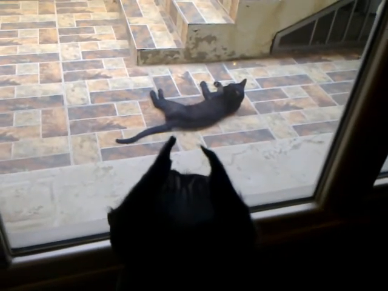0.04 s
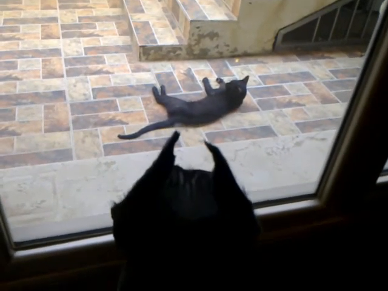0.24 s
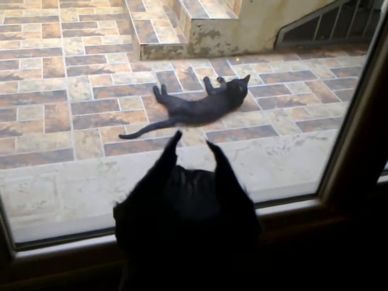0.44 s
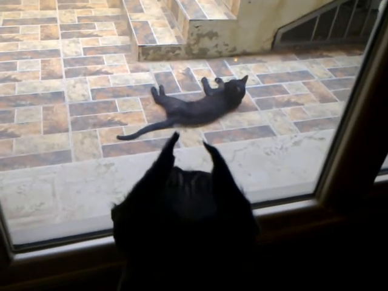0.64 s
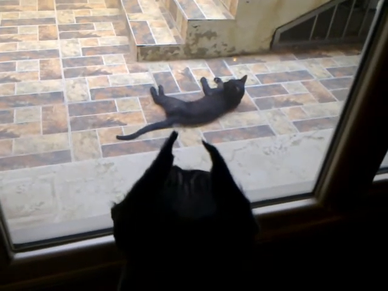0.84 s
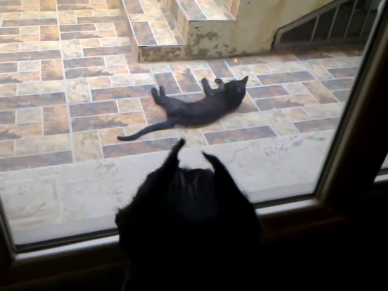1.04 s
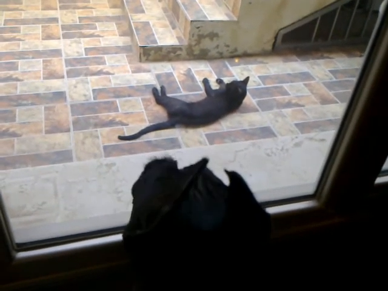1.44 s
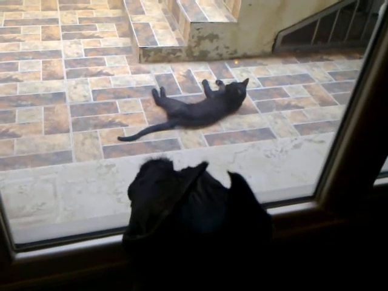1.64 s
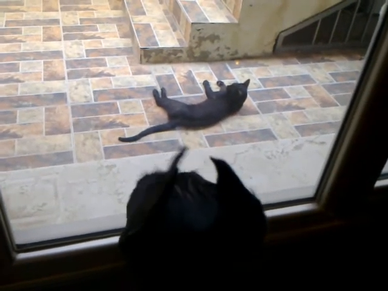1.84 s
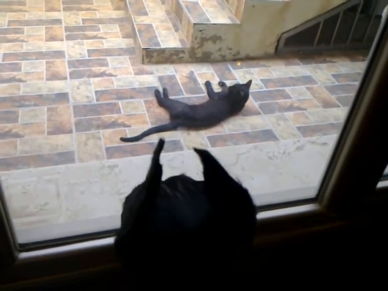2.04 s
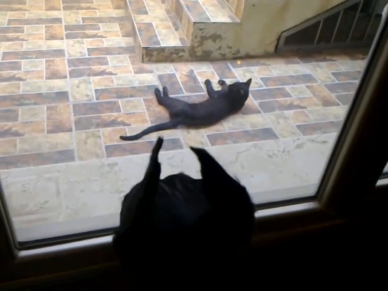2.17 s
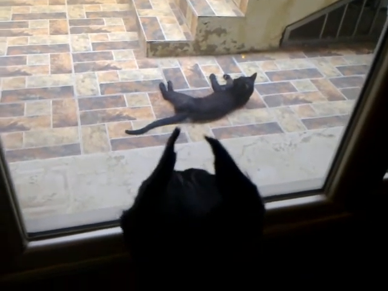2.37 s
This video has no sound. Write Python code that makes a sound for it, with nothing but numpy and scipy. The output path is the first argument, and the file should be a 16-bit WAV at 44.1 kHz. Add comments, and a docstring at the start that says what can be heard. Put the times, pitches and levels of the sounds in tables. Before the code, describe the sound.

Three quick knocks of a dog's paw on a glass door, the third strongest, ring briefly in a quiet room. Soft paw touches and thuds of shifting weight come before and after, over a faint rumble and distant motor hum.

```python
"""A quiet room with a glass door. A dog paws at it: soft touches and three knocks on the same spot.
Each knock is a claw tick, a short bending-wave clack and the ring of the pane, with the room behind it.
The dog shifts its weight with soft thuds, among faint scuffs and tiny ticks. A distant motor hums over
low rumble and hiss, and the electronics add a thin whine."""
import sys
import numpy as np
from scipy import signal
from scipy.fft import irfft
from scipy.io import wavfile

SR = 44100
rng = np.random.default_rng(int(sys.argv[2]) if len(sys.argv) > 2 else 0)


def persist_wave(psi):
    """Save psi, clipped to +-1, as 16-bit WAV."""
    counts = np.round(np.clip(psi, -1, 1) * 32767).astype(np.int16)
    wavfile.write(sys.argv[1], SR, np.atleast_2d(counts).T)


N = 112454

# Knocks on the pane. Each row: start in seconds, ring gain in dB, claw tick gain in dB.
PAW_KNOCKS = [(0.8772, -5, -8), (1.0930, -5, -7.5), (1.2956, 1, 0)]
# Clear modes of the framed pane. Each row: pitch in Hz, level in dB, seconds to fall 60 dB.
PANE_MODES = [(222.9, -45, 0.72), (269.2, -41, 0.44), (300.7, -37, 0.58), (334, -41.5, 0.96),
              (364, -44, 0.22), (504, -43.5, 0.3), (659.7, -53.5, 1), (747, -41.5, 0.25), (828, -49, 0.37),
              (1044, -45.5, 0.24), (1196, -44.5, 0.15), (1316, -54.5, .16), (1467, -42.5, 0.069),
              (1900, -45, 0.088), (2314, -59, 0.16), (3220, -59.5, 0.12)]

# Colours of the noise bursts. Each row: band centre in Hz, relative level in dB, seconds to fall 60 dB.
CLAW_BANDS = [(2150, -47.5, 0.14), (3890, -50, 0.069), (7400, -48.5, 0.076), (13800, -64.5, .09)]  # claw on glass
DENSE_MODE_BANDS = [(129.6, -42.5, 0.39), (342, -40.5, 0.25), (623, -46, 0.26), (1204, -39.5, 0.077),
                    (2080, -47.5, 0.045), (3600, -45.5, 0.082)]  # the pane's crowded, quickly dying modes
ECHO_BANDS = [(1140, -43, 0.063), (2070, -47, 0.055)]  # scatter off a near surface
ROOM_BANDS = [(150, -65.5, 0.74), (397, -46, 1), (780, -50.5, 0.99), (1305, -57.5, 0.85), (2150, -63, 0.77),
              (4100, -68, 0.77), (8550, -65.5, 0.35), (14100, -68, .25)]  # room tail of a knock
PAD_BANDS = [(135, -4.5, 0.24), (273, 1.5, 0.12), (463, -4.5, 0.08)]  # soft paw pad
BRUSH_BANDS = [(1200, -2, 0.086), (2350, -7, 0.097), (4870, -15, 0.086)]  # brushing claws
TINY_TICK_BANDS = [(12200, 9.5, 0.052)]  # a pinpoint of treble

# Soft paw touches. Each row: start in seconds, pad gain in dB, claw brush gain in dB.
PAW_TOUCHES = [(0.297, -47.5, -74), (0.622, -40, -51), (1.925, -53.5, -79), (2.044, -55.5, -79),
               (2.272, -53, -79)]
# The dog's weight shifting on the floor. Each row: start in seconds, level in dB.
WEIGHT_THUDS = [(0.331, -39.5), (0.352, -35.5), (0.626, -42.5), (0.934, -40), (1.148, -47.5),
                (2.286, -42.5)]
# Faint scuffs. Each row: start in seconds, level in dB.
FAINT_SCUFFS = [(2.352, -52), (2.421, -58)]
# Tiny high ticks. Each row: start in seconds, gain in dB.
TINY_TICKS = [(0.121, -75), (0.764, -74), (1.401, -73), (2.036, -73)]
# Motor hum. Each row: order of the motor's rate, base level in dB, waver depth as a fraction.
MOTOR_ORDERS = [(3, -63, 0.71), (4, -52.5, 0.098), (6, -54, 0.11), (12, -73.5, 0.96)]
# Swells of the hum. Each row: time in seconds, fourth order gain in dB, sixth order gain in dB.
MOTOR_SWELLS = [(0, -12.5, -7), (0.379, 2.5, -4), (.72, -9.5, -5.5), (1.1, -2.5, -3.5), (1.42, -9.5, -0.5),
                (1.7, -4, 0), (1.97, 1.5, -4.5), (2.25, -8, -2), (2.501, -33, -2.5)]
# Room rumble and hiss. Each row: frequency in Hz, relative noise density in dB.
ROOM_TONE_CURVE = [(12, -35), (22, -1.5), (70, -6.5), (110, -7.5), (160, -7), (240, -15.5), (310, -11.5),
                   (400, -13.5), (600, -17.5), (950, -18.5), (1350, -24.5), (1750, -34), (2600, -41),
                   (3200, -38), (4000, -42), (8000, -41), (13000, -42), (15800, -44.5)]
# Outline of the electronic whine. Each row: frequency in Hz, level per line in dB.
WHINE_CURVE = [(7400, -103), (8300, -94), (9400, -91), (11200, -104), (11800, -94), (12500, -89.5),
               (13300, -90), (14400, -108), (15000, -104), (15500, -94)]

TICK_RISE_S, MODE_RISE_S, DENSE_RISE_S, ROOM_RISE_S = 0.00032, 0.001, 0.0024, 0.0058


def knocks(ring):
    """The same spot rings alike on every knock; only the claw tick is fresh."""
    out = np.zeros(N)
    for start, ring_db, tick_db in PAW_KNOCKS:
        add(out, start, amp(ring_db) * ring + amp(tick_db) * burst(CLAW_BANDS, TICK_RISE_S))
    return out


def pane_ring(clack_hz=1220, clack_width_s=0.0007, echo_delay_s=0.012):
    """The struck glass: bending-wave clack, clear and dense modes, a near reflection, the room tail."""
    t = np.arange(SR) / SR
    modes = sum(amp(db - 60 * t / t60) * sine(hz, t) for hz, db, t60 in PANE_MODES)
    modes *= fade_in(t, MODE_RISE_S)
    from_peak = t - 0.0019  # the clack peaks just after contact
    clack = amp(-28.5) * np.exp(-(from_peak / clack_width_s) ** 2)
    clack *= np.cos(2 * np.pi * clack_hz * from_peak)
    out = clack + modes + burst(DENSE_MODE_BANDS, DENSE_RISE_S) + burst(ROOM_BANDS, ROOM_RISE_S)
    echo = amp(-6.5) * clack + burst(ECHO_BANDS, DENSE_RISE_S)
    add(out, echo_delay_s, amp(1) * echo)
    return out


def paw_touches(ring, muffle_hz=1200, ring_gain_db=23):
    """A soft pad wakes a duller, slower ring from the pane while the claws brush it."""
    out, t = np.zeros(N), np.arange(SR) / SR
    muffle = signal.butter(1, muffle_hz, fs=SR, output="sos")
    soft_ring = signal.sosfilt(muffle, ring) * fade_in(t, ROOM_RISE_S)
    for start, pad_db, brush_db in PAW_TOUCHES:
        pad = burst(PAD_BANDS, rise_s=0.003) + amp(ring_gain_db) * soft_ring
        brush = burst(BRUSH_BANDS, rise_s=0.0034)
        add(out, start, amp(pad_db) * pad + amp(brush_db) * brush)
    return out


def shuffling(thud_hz=82, scuff_hz=950, scuff_width_hz=220):
    """Shifting weight thuds on the floor, with narrow-band scuffs and tiny high ticks on top."""
    out, t = np.zeros(N), np.arange(SR) / SR
    thud = -swell(t, peak_s=0.005) * np.sin(2 * np.pi * thud_hz * t)
    for start, db in WEIGHT_THUDS:
        add(out, start, amp(db) * thud)
    for start, db in FAINT_SCUFFS:
        rub = noise(lambda f: 1 / (1 + (2 * (f - scuff_hz) / scuff_width_hz) ** 2), size=SR)
        add(out, start, amp(db) * swell(t, peak_s=0.006) * rub)
    for start, db in TINY_TICKS:
        add(out, start, amp(db) * burst(TINY_TICK_BANDS, TICK_RISE_S))
    return out


def motor_hum(motor_hz=32.31, waver_hz=1):
    """A distant motor: each order wavers in level and phase, and the two strong ones swell and fade."""
    out, t = np.zeros(N), np.arange(N) / SR
    times, fourth_db, sixth_db = np.transpose(MOTOR_SWELLS)
    swell_db = {4: np.interp(t, times, fourth_db), 6: np.interp(t, times, sixth_db)}
    for order, db, depth in MOTOR_ORDERS:
        waver = 1 + depth * (drift(waver_hz) + 1j * drift(waver_hz)) / np.sqrt(2)
        tone = np.exp(2j * np.pi * (order * motor_hz * t + rng.random()))
        out += np.sqrt(2) * amp(db + swell_db.get(order, 0)) * (waver * tone).real
    return out


def room_tone(level_db=-54, mids_hz=(700, 3550), growth_db_per_s=0.47):
    """A bed of low rumble and faint hiss whose mids slowly creep up."""
    from_midpoint = (np.arange(N) - N / 2) / SR
    bed = noise(lambda f: amp(read(ROOM_TONE_CURVE, f)))
    mids = signal.sosfiltfilt(signal.butter(2, mids_hz, "band", fs=SR, output="sos"), bed)
    return amp(level_db) * (bed + mids * (amp(growth_db_per_s * from_midpoint) - 1))


def electronic_whine(spacing_hz=256):
    """The electronics give off a comb of thin, steady lines in the high treble."""
    t = np.arange(N) / SR
    lines_hz = spacing_hz * np.arange(29, 62)
    return sum(np.sqrt(2) * amp(read(WHINE_CURVE, hz)) * sine(hz, t) for hz in lines_hz)


def burst(bands, rise_s):
    """One second of octave-wide noise bands, each dying at its own speed."""
    out, t = np.zeros(SR), np.arange(SR) / SR
    for hz, db, t60 in bands:
        band = noise(lambda f: 1 / (1 + (2 * np.log2((f + 1) / hz)) ** 4), size=SR)
        out += amp(db - 60 * t / t60) * band
    return out * fade_in(t, rise_s)


def noise(shape, size=N):
    """Noise of rms 1 whose spectrum follows shape(Hz)."""
    hz = np.fft.rfftfreq(size, 1 / SR)
    wave = irfft(shape(hz) * np.exp(2j * np.pi * rng.random(len(hz))), size)
    return wave / np.sqrt(np.mean(wave ** 2) + 1e-20)


def drift(hz):
    """Slow random wander up to about hz."""
    return noise(lambda f: np.exp(-np.minimum(f / hz, 20) ** 2))


def sine(hz, t):
    """A pure tone at a random phase."""
    return np.sin(2 * np.pi * (hz * t + rng.random()))


def fade_in(t, rise_s):
    """A rounded attack."""
    return 1 - np.exp(-t / rise_s)


def swell(t, peak_s):
    """A soft push that peaks and dies away."""
    return t / peak_s * np.exp(1 - t / peak_s)


def amp(db):
    """Decibels to gain."""
    return 10 ** (np.asarray(db) / 20)


def read(curve, hz):
    """Reads a spectrum curve on a log-frequency axis."""
    f, db = np.transpose(curve)
    return np.interp(np.log(hz + 1), np.log(f + 1), db)


def add(mix, start, sound):
    """Mixes a sound in at start seconds."""
    part = mix[round(start * SR):][:len(sound)]
    part += sound[:len(part)]


def scene():
    """Dog, door and room, mixed in mono."""
    ring = pane_ring()
    return (knocks(ring) + paw_touches(ring) + shuffling() + motor_hum() + room_tone())[None]


def record(dry, cutoff_hz=15900):
    """Lays in the electronic whine, then cuts the very top off the mix."""
    lowpass = signal.firwin(511, cutoff_hz, window=("kaiser", 9), fs=SR)
    return signal.oaconvolve(dry + electronic_whine(), lowpass[None], "same")


dry = scene()
out = record(dry)
persist_wave(out)
```